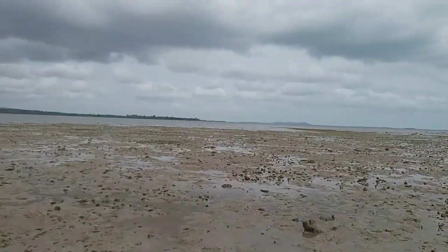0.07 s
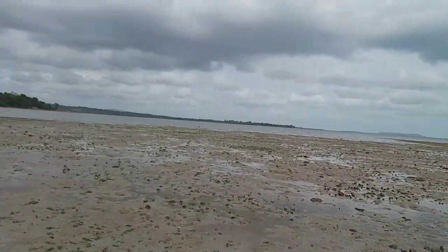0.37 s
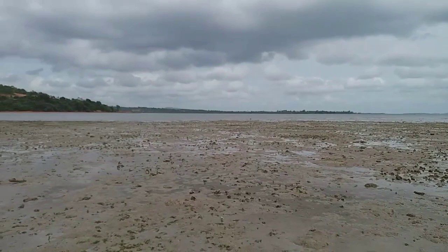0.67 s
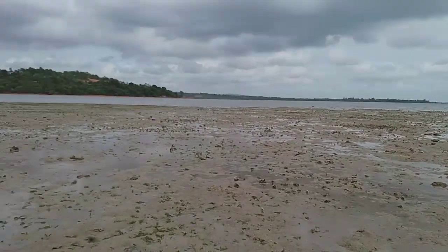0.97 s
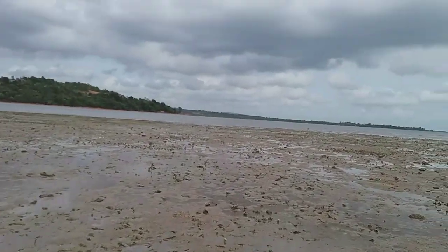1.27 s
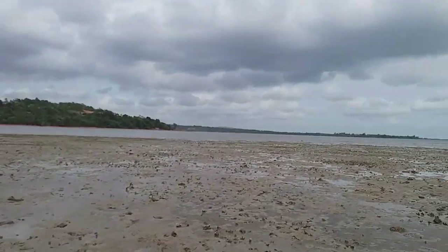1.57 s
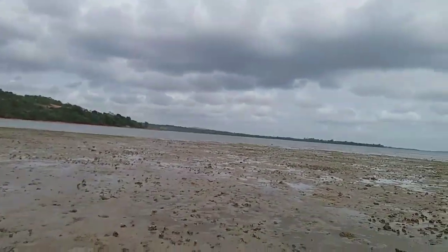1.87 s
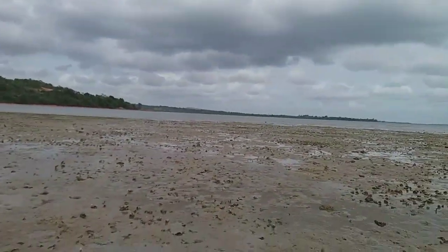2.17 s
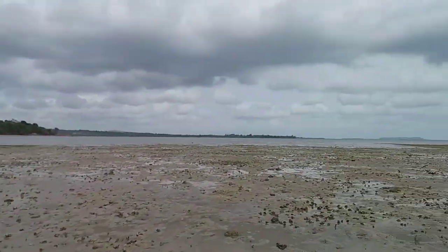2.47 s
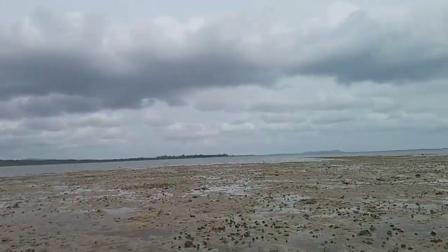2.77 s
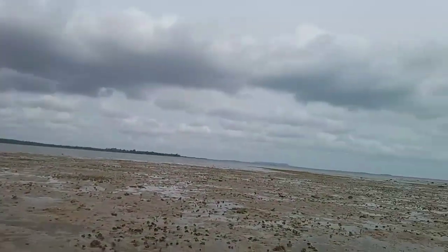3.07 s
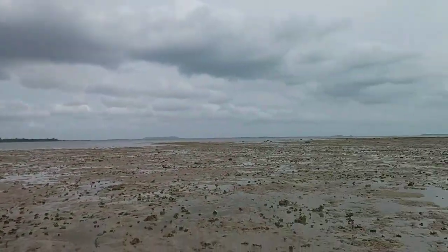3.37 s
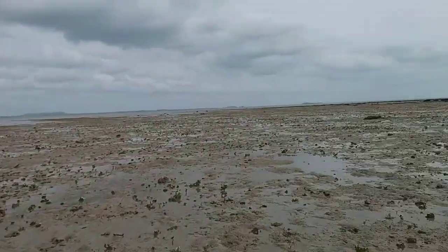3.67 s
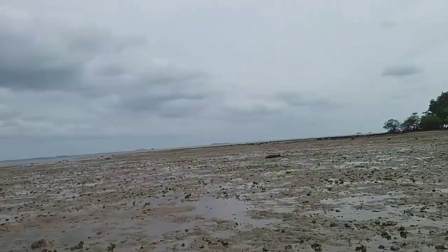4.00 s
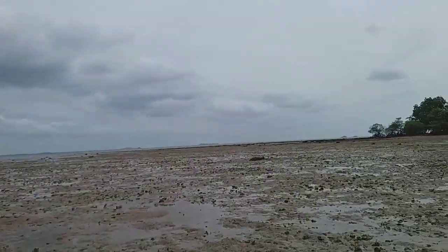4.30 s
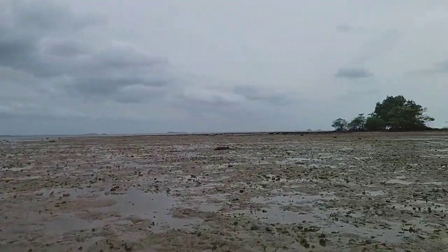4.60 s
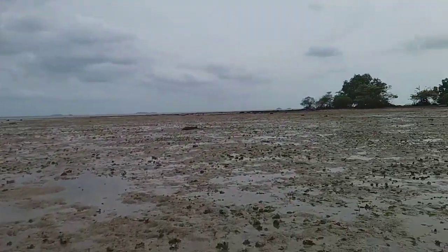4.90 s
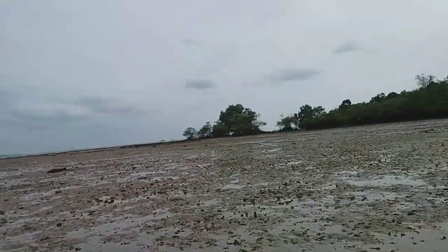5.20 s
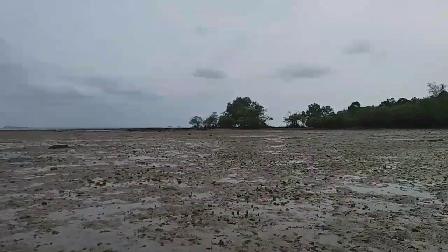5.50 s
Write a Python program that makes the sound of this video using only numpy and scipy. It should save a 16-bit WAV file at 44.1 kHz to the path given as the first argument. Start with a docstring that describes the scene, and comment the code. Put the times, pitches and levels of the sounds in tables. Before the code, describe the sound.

Someone walks evenly across wet mud with soft smacks and squelches, while much louder wind buffets the microphone.

```python
"""Wet footsteps in gusty wind

Someone walks over a wet tidal flat, a step about every 0.65 s, holding a small camera.
Each sole presses water out of the muddy sand: a gritty hiss, tiny bubbles, smacks and plops.
Swirls of air (eddies) tumble over the microphone and rumble and thump far louder than the steps.
Wind and water hiss softly in the distance."""
import sys
import numpy as np
from scipy import signal
from scipy.fft import rfft, irfft, next_fast_len
from scipy.io import wavfile
from scipy.ndimage import uniform_filter1d

SR = 44100
rng = np.random.default_rng(int(sys.argv[2]) if len(sys.argv) > 2 else 0)


def transcribe(u):
    """Save the signal u as a 16-bit wav file named by the first command-line argument.

    u: samples, shape (n,) or (channels, n), limited to [-1, 1]; the rate is SR.
    q: integer samples, one column per channel.
    """
    v = np.clip(np.atleast_2d(u).T, -1, 1)
    q = np.round(v * 32767).astype(np.int16)
    wavfile.write(sys.argv[1], SR, q)


N = 249165
TIME = np.arange(N) / SR

# Each footstep, from heel strike through flat sole to lift-off:
# heel_s, heel_db, flat_s, squelch_db, squelch_decay_s, lift_s, seep_db, spray_db
FOOTSTEPS = [(0.073, -59, .125, -72, .015, 0.39, -54.5, 3.5),
             (0.723, -68, .925, -45, .018, 0.95, -66.5, 3.5),
             (1.423, -56, 1.59, -47.5, 0.023, 1.67, -59.5, 2.5),
             (2.004, -46.5, 2.045, -39, 0.022, 2.255, -61.5, 3.5),
             (2.708, -55, 2.905, -46, 0.026, 2.99, -60, 1), (3.356, -48, 3.513, -40, 0.022, 3.66, -61.5, 0),
             (4.031, -47.5, 4.125, -63, 0.015, 4.25, -71.5, 4.5),
             (4.664, -51, 4.815, -55, 0.029, 4.9, -65, 3),
             (5.323, -48.5, 5.345, -44.5, 0.018, 5.52, -60.5, -1.5)]
# The tone of wet mud, from low to high: pitch_hz, level_db
MUD_TONE = [(250, -21), (700, -4.5), (1500, 1), (2600, 2), (4400, 1.5), (5900, -2), (6900, -1), (8300, -13),
            (10500, -10), (15500, -16)]


def undb(db):
    """Turn decibels into a number to multiply a sound by."""
    return 10 ** (np.asarray(db) / 20)


def curve(points):
    """Join (time, value) points with straight lines, giving one value per sample."""
    times, values = np.transpose(points)
    return np.interp(TIME, times, values)


def add(track, start_s, sound):
    """Mix a sound into the track, dropping whatever falls outside it."""
    start = int(start_s * SR)
    lo, hi = max(start, 0), min(start + len(sound), N)
    if hi > lo:
        track[lo:hi] += sound[lo - start:hi - start]


def keep_side(x, hz, side, order=2):
    """Keep the "low" or the "high" side of hz; a higher order cuts more sharply."""
    return signal.sosfilt(signal.butter(order, hz, side, fs=SR, output="sos"), x)


def treble(x, db, hz=8500):
    """Raise or lower everything above hz."""
    backward = keep_side(x[::-1], hz, "high")
    upper = keep_side(backward[::-1], hz, "high")  # filtering both ways keeps it in step with x
    return x + (undb(db) - 1) * upper


def colour(x, tone):
    """Shape the tone of a sound with (pitch_hz, level_db) points."""
    hz, db = np.transpose(tone)
    size = next_fast_len(len(x) + 2048)
    bins_hz = np.maximum(np.arange(size // 2 + 1) * SR / size, 1)
    gain = undb(np.interp(np.log(bins_hz), np.log(hz), db))
    return irfft(rfft(x, size) * gain, size)[:len(x)]


def even_out(x, span_s):
    """Hold the average level at 1, keeping any flicker faster than span_s."""
    size = int(span_s * SR)
    power = uniform_filter1d(uniform_filter1d(x ** 2, size), size)
    return x / np.sqrt(np.abs(power) + 1e-12)


def wander(turns_per_s):
    """A value that drifts smoothly at random, typically by about 1 either way."""
    size = int(SR / turns_per_s)
    held = np.repeat(rng.standard_normal(N // size + 1), size)[:N]
    smooth = uniform_filter1d(held, size)
    return smooth / smooth.std()


def airflow():
    """Breeze and gusts add up to the strength of the rumble and of the small eddies, in dB."""
    # The breeze at the microphone: time_s, level_db
    breeze = [(0.0, -26), (0.93, -30), (1.08, -19), (1.88, -20.5), (2.02, -25), (2.5, -19), (2.69, -28),
              (2.92, -26.5), (3.12, -19), (3.28, -22.5), (3.42, -39), (3.56, -32.5), (3.71, -49.5),
              (3.75, -35), (4.3, -30), (4.43, -33.5), (4.52, -25.5), (4.82, -35), (4.98, -39), (5.025, -54),
              (5.07, -34), (5.33, -33), (5.39, -19), (5.65, -18.5)]
    # Short gusts that swell and die on top of it: middle_s, length_s, rumble_db, flutter_db
    gusts = [(0.025, 0.057, -14, -17.5), (0.181, 0.072, -15.5, -23), (0.275, 0.17, -17, -30),
             (0.444, 0.067, -28, -32.5), (0.58, .15, -18, -31), (0.705, 0.037, -11.5, -20),
             (0.759, 0.04, -11, -22), (0.85, 0.046, -20.5, -31), (1.345, .08, -22, -20),
             (1.504, 0.022, -22, -17), (1.602, .03, -22, -17.5), (1.74, 0.039, -10.5, -14),
             (1.817, 0.047, -19, -20), (2.504, 0.041, -22, -22), (2.547, 0.053, -22, -22),
             (2.763, 0.066, -18.5, -24), (2.967, .07, -21, -36), (3.079, 0.066, -21.5, -26),
             (3.283, 0.049, -14.5, -16.5), (3.377, 0.077, -30.5, -48), (3.526, 0.057, -22.5, -25.5),
             (3.875, 0.027, -21, -44), (3.946, 0.031, -23.5, -38.5), (4.004, 0.051, -32.5, -36.5),
             (4.082, 0.044, -21.5, -29.5), (4.117, 0.024, -22, -30.5), (4.259, .09, -21, -20),
             (4.343, 0.13, -23.5, -35.5), (4.501, 0.058, -20.5, -21.5), (4.547, 0.056, -18.5, -24.5),
             (4.609, 0.044, -25, -24.5), (4.77, .07, -22.5, -25.5), (4.887, 0.1, -28, -43.5),
             (5.064, 0.037, -27, -41.5), (5.188, 0.074, -23.5, -31.5), (5.284, 0.039, -30, -38.5),
             (5.386, 0.033, -15.5, -21.5), (5.474, 0.04, -27, -17), (5.571, 0.051, -13.5, -19)]
    breeze_db = curve(breeze)
    rumble_power = undb(breeze_db) ** 2
    flutter_power = undb(-26.5 + 1.572 * (breeze_db + 20)) ** 2  # small eddies grow faster than rumble
    for middle_s, length_s, rumble_db, flutter_db in gusts:
        progress = np.clip((TIME - middle_s) / length_s + .5, 0, 1)
        swell = np.sin(np.pi * progress) ** 1.02
        rumble_power += (undb(rumble_db) * swell) ** 2
        flutter_power += (undb(flutter_db) * swell) ** 2
    return 10 * np.log10(rumble_power), 10 * np.log10(flutter_power)


def rumble(level_db):
    """Churning air rumbles; its upper part comes in puffs and dies away in the lulls."""
    # The deep tone of wind on a microphone: pitch_hz, level_db
    rumble_tone = [(20, -26.5), (32, -27), (50, -12.5), (65, -3.5), (120, -0.5), (190, -2), (300, -8),
                   (420, -16), (650, -37), (1200, -56), (2500, -92.5)]
    noise = even_out(colour(rng.standard_normal(N), rumble_tone), span_s=0.19)
    puffs_db = 4 * wander(28).clip(-2, 1.2)
    lulls_db = 0.38 * np.minimum(level_db + 23, 0)
    return treble(noise, puffs_db + lulls_db, hz=210) * undb(level_db)


def eddy(hz, turn):
    """A passing swirl pushes and pulls once, more briefly at higher hz; turn (0 to 1) sets its shape."""
    position = np.linspace(-14, 14, int(28 * SR / (np.pi * hz)))
    pressure = np.real(np.exp(2j * np.pi * turn) / (1 - 1j * position) ** 3)
    return pressure * np.hanning(len(position))


def flutter(level_db, base_hz=255, count=2200):
    """Small eddies arrive in clumps; the harder the air pushes, the faster they pass."""
    out = np.zeros(N)
    timings = rng.random((count, 2))
    variations = rng.standard_normal((count, 2)).clip(-1.8, 1.8)
    clump = wander(110).clip(-2, 2)
    speed = undb(0.1165 * (np.minimum(level_db, -22) + 33)) * np.exp(0.097 * clump)
    for (when, turn), (pace, size) in zip(timings, variations):
        i = int(when * N)
        hz = base_hz * speed[i] * np.exp(0.193 * pace)
        add(out, i / SR, undb(3 * size + 4 * clump[i]) * eddy(hz, turn))
    return even_out(keep_side(out, 270, "high"), span_s=0.079) * undb(level_db)


def soft_thumps(flutter_db, middle_hz=350, count=36):
    """Stray eddies thump at random times, harder when the air is rough."""
    out = np.zeros(N)
    for when, pace, turn in rng.random((count, 3)):
        level_db = min(flutter_db[int(when * N)] + 9, -14)
        thump = eddy(middle_hz * np.exp(0.18 * (2 * pace - 1)), turn)
        add(out, (when * N - len(thump) / 2) / SR, undb(level_db) * thump)
    return out


def strong_thumps(main_pace=0.96, weak_pace=0.79, weak_db=-5.5, spread_s=0.004033):
    """Each strong eddy thumps the microphone, with three weaker, slower ones tumbling around it."""
    # Strong single eddies (the paces scale their pitch): middle_s, level_db, base_pitch_hz
    strong_eddies = [(0.022, -4.5, 627), (0.041, -9, 424), (0.164, -2, 200), (0.203, -1.5, 324),
                     (0.344, -13.5, 308), (0.702, 1.5, 450), (0.761, -7, 586), (0.843, -4, 302),
                     (1.009, -5, 262), (1.071, -5.5, 330), (1.098, -3, 433), (1.15, -2, 460),
                     (1.167, -5.5, 443), (1.183, 1, 166), (1.208, -5.5, 420), (1.236, -8.5, 400),
                     (1.302, -1, 348), (1.33, -3, 500), (1.344, 0.5, 370), (1.359, -2.5, 522),
                     (1.418, -6, 420), (1.461, 0, 450), (1.497, -2.5, 525), (1.512, 0.5, 505),
                     (1.551, -5.5, 380), (1.601, -2, 514), (1.642, -5.5, 475), (1.703, -11.5, 472),
                     (1.723, -6, 586), (1.802, 0.5, 500), (1.806, -2, 600), (1.827, -2, 495),
                     (2.173, -9, 330), (2.207, -4.5, 310), (2.264, -2.5, 434), (2.308, -10, 423),
                     (2.334, -6.5, 308), (2.382, -4.5, 344), (2.456, -1.5, 377), (2.507, -5, 380),
                     (2.859, -4, 160), (2.988, -13, 330), (3.064, -4.5, 275), (3.089, -9, 380),
                     (3.118, -2.5, 165), (3.148, -11, 320), (3.274, -1, 400), (3.287, -3.5, 320),
                     (3.489, -11.5, 143), (4.231, -3, 174), (4.246, 0, 500), (4.278, -1, 168),
                     (4.469, -3, 565), (4.507, -2, 540), (4.532, -12, 450), (4.555, -8.5, 374),
                     (4.605, -9, 348), (4.616, -5, 260), (4.668, -8, 437), (4.772, -5.5, 290),
                     (5.146, -7, 298), (5.277, -16.5, 386), (5.379, -10, 663), (5.395, -4, 845),
                     (5.426, -2, 413), (5.472, 1, 450), (5.508, -8.5, 930), (5.537, -7.5, 590),
                     (5.554, -8, 495), (5.572, -8, 547), (5.579, 5, 940), (5.601, -11.5, 1100),
                     (5.624, -2.5, 540)]
    out = np.zeros(N)
    for middle_s, level_db, base_hz in strong_eddies:
        main = eddy(main_pace * base_hz, rng.random())
        add(out, middle_s - len(main) / SR / 2, undb(level_db) * main)
        for lag, turn in rng.random((3, 2)):
            weak = eddy(weak_pace * base_hz, turn)
            weak_s = middle_s + (3 * lag - 1) * spread_s
            add(out, weak_s - len(weak) / SR / 2, undb(level_db + weak_db) * weak)
    return out


def wind():
    """Rough air at the microphone's opening: a deep rumble, fluttering eddies and single thumps."""
    rumble_db, flutter_db = airflow()
    air = undb(5) * rumble(rumble_db) + undb(0.5) * flutter(flutter_db)
    air = air + soft_thumps(flutter_db) + undb(-0.07) * strong_thumps()
    air = keep_side(air, 42, "high", order=3)  # the slowest pushes leak out through a vent
    air = air / (1 + (air / .93) ** 4) ** (1 / 4)  # the microphone's membrane rounds off the strongest
    return keep_side(air, 3700, "low", order=10)  # eddies smaller than the opening average out


def distant_hiss():
    """Wind and water hiss smoothly, far across the flat."""
    # The tone of the hiss: pitch_hz, level_db
    hiss_tone = [(500, 5.5), (1000, 3), (2000, -2.5), (3000, -8.5), (4500, -14.5), (5800, -23),
                 (6900, -20.5), (8000, -41), (9000, -21.5), (10500, -20), (15500, -21.5)]
    # Its slow rise and fall: time_s, level_db
    hiss_levels = [(0, -52.5), (1.25, -49.5), (2.6, -52.5), (3.9, -52), (4.6, -56.5), (5.65, -52.5)]
    sway_db = .6 * wander(3)
    hiss = even_out(colour(rng.standard_normal(N), hiss_tone), span_s=0.91)
    return hiss * undb(curve(hiss_levels) + sway_db)


def bubble(hz, cycles, glide):
    """A tiny hollow of air rings and rises in pitch as it opens."""
    progress = np.linspace(0, 1, int(cycles * SR / hz) + 4)
    ring = np.sin(2 * np.pi * cycles * progress * (1 + glide * progress))
    return ring * np.exp(-5 * progress) * (1 - progress)


def crackle(low_hz=1000, high_hz=13000, count=10000):
    """Films of water and tiny bubbles burst between the sand grains."""
    out = np.zeros(N)
    bursts = rng.random((count, 3))
    sizes = rng.exponential(size=count).clip(0, 4.5)
    for (when, pitch, ring), size in zip(bursts, sizes):
        hz = low_hz * (high_hz / low_hz) ** pitch
        burst = bubble(hz, cycles=2 + 24 * ring ** 2, glide=.12)
        add(out, when * N / SR, undb(3 * size) * np.sqrt(hz) * burst)
    return even_out(out, span_s=0.033)


def gurgle(middle_hz=3600, count=520):
    """Larger bubbles in the squeezed water each give a short rising plip."""
    out = np.zeros(N)
    for when, (pitch, size) in zip(rng.random(count), rng.standard_normal((count, 2)).clip(-1.7, 1.7)):
        plip = bubble(middle_hz * np.exp(.35 * pitch), cycles=40, glide=0.11)
        add(out, when * N / SR, undb(3 * size) * plip)
    return out


def peak_at(peak_s, rise_s, fall_s):
    """A level that swells to 1 at peak_s and dies away."""
    distance = np.maximum((peak_s - TIME) / rise_s, (TIME - peak_s) / fall_s)
    return np.exp(-np.minimum(distance, 20))


def squelches(heel_rise_s=.007, heel_decay_s=0.018, drain_db_per_s=14, release_s=0.0074, refill_s=0.21):
    """The heel lands, the sole flattens, water seeps: hiss, crackle and bubbles follow the pressure."""
    pressure, treble_db = np.zeros(N), np.zeros(N)
    spurts_db = 2 * wander(55).clip(-2, 2)  # water seeps out unevenly
    for heel_s, heel_db, flat_s, squelch_db, decay_s, lift_s, seep_db, spray_db in FOOTSTEPS:
        since_heel = np.maximum(TIME - heel_s, 0)
        since_lift = np.maximum(TIME - lift_s, 0)
        contact = np.minimum(since_heel / heel_rise_s, 1) * np.exp(-since_lift / release_s)
        heel = undb(heel_db) * np.exp(-since_heel / heel_decay_s)
        sole = undb(squelch_db) * peak_at(flat_s, 0.52 * decay_s, decay_s)
        seep = undb(seep_db + spurts_db - drain_db_per_s * since_heel)
        refill = undb(-68) * (since_heel > 0) * np.exp(-since_lift / refill_s)  # the footprint fills
        pressure += contact * (heel + sole + seep) + refill
        treble_db[TIME > heel_s] = spray_db + 7  # fine spray brightens the sound
    grit = crackle() + undb(-5) * rng.standard_normal(N)
    wet_sand = even_out(colour(grit, MUD_TONE), span_s=0.016)
    bubbling = np.tanh(pressure / undb(-52))  # bubbles grow no louder under a hard push
    return treble(wet_sand, treble_db) * pressure + undb(-43) * bubbling * gurgle()


def smack(hz, spray_db, ring_db=1, cycles=18):
    """Mud slaps or tears from the sole: a wet crack, a ringing hollow and a short splatter."""
    t = TIME[:2048]
    swell = 1 - np.exp(-t / .0014)
    crack = np.exp(-t / .003)
    splatter = undb(-15) * np.exp(-t / .01)
    sound = rng.standard_normal(len(t)) * (crack + splatter)
    add(sound, 0, undb(ring_db) * bubble(hz, cycles, glide=0.026))
    sound = treble(colour(sound * swell, MUD_TONE), spray_db + 10)
    return sound / np.abs(sound).max()


def loud_smacks(lead_s=.001):
    """The mud smacks loudly several times with each step."""
    # Wet smacks of mud on the sole: peak_s, level_db, pitch_hz, spray_db
    mud_smacks = [(0.0782, -23.5, 4180, -6), (0.1093, -25.5, 4130, -10), (0.128, -22, 4130, -3),
                  (0.184, -32, 2970, -20), (0.3786, -28, 2750, -4), (0.434, -33, 2420, -30),
                  (0.6379, -45, 2640, -13), (0.7246, -20, 2830, -10), (0.7344, -32, 5140, 5),
                  (0.78, -28, 2650, -5), (0.842, -32, 2680, 0), (0.9098, -32, 2500, -20),
                  (0.997, -35.5, 6540, -10), (1.3124, -44.5, 2500, -24), (1.4284, -19, 4430, -9),
                  (1.472, -22, 4600, -3), (1.5493, -22.5, 4860, -11), (1.5895, -27, 2440, -21),
                  (1.6047, -29, 3880, 8), (1.6364, -26, 2920, -28), (1.756, -29.5, 2650, -8),
                  (2.0357, -24, 3670, -21), (2.2038, -27.5, 2510, -4), (2.253, -31.5, 2750, 9),
                  (2.753, -32, 3850, -21), (2.827, -31.5, 2540, -3), (2.949, -31, 3780, -6),
                  (3.083, -39, 3660, -4), (3.1353, -41.5, 2500, 1), (3.365, -21.5, 4780, -14),
                  (3.407, -30, 3800, -10), (3.508, -21, 7360, -1), (3.6682, -38, 2600, -28),
                  (3.8294, -30, 3050, -37), (4.0342, -25.5, 4850, -9), (4.122, -31.5, 2550, -19),
                  (4.188, -36.5, 2580, -20), (4.2577, -32, 2560, -26), (4.2867, -44, 4210, -32),
                  (4.332, -38.5, 4030, -22), (4.393, -40, 2770, -24), (4.4363, -52, 3200, -5),
                  (4.6694, -31, 2820, -27), (4.7175, -36, 4140, 0.5), (4.7383, -31, 2750, -27),
                  (4.815, -29, 3550, -3), (4.912, -34, 2740, -30), (4.971, -33, 2590, -26),
                  (5.08, -43, 6500, -10), (5.189, -35.5, 2820, -37), (5.412, -28.5, 2900, -18)]
    out = np.zeros(N)
    for peak_s, level_db, pitch_hz, spray_db in mud_smacks:
        add(out, peak_s - lead_s, undb(level_db) * smack(pitch_hz, spray_db))
    return out


def soft_pops(low_hz=2500, high_hz=4400, settle_s=.06, per_step=4):
    """Softer, rounder pops come at random under each foot and while its print settles."""
    out = np.zeros(N)
    for heel_s, _, _, _, _, lift_s, _, _ in FOOTSTEPS:
        for when, softness, pitch in rng.random((per_step, 3)):
            start_s = heel_s + when * (lift_s + settle_s - heel_s)
            pop = smack(low_hz + pitch * (high_hz - low_hz), spray_db=-16, ring_db=9, cycles=28)
            add(out, start_s, undb(-38 - 9 * softness) * pop)
    return out


def air_plops():
    """Trapped air squirts out with a rough plop; its pitch slides as the pocket changes size."""
    # Air pockets squeezed out of the mud: start_s, start_hz, end_hz, length_s, level_db, roughness
    air_pockets = [(0.435, 1200, 1460, 0.0033, -33, 0.93), (0.821, 1650, 2750, 0.022, -47, 0.23),
                   (0.923, 2860, 2600, 0.0088, -36, 0.51), (.922, 1280, 1600, 0.0097, -36.5, 0.38),
                   (3.59, 1090, 1420, 0.0099, -38.5, 1.5), (3.667, 2030, 2410, 0.007, -34.5, 0.74),
                   (3.827, 1230, 2160, 0.0066, -34, 0.77), (4.913, 1140, 1500, 0.0048, -39.5, 1.4),
                   (4.972, 2260, 2450, 0.0034, -35.5, 0.34)]
    out = np.zeros(N)
    for start_s, start_hz, end_hz, length_s, level_db, roughness in air_pockets:
        progress = np.linspace(0, 1, int(length_s * SR))
        pitch_hz = start_hz + (end_hz - start_hz) * progress
        jitter = 1 + roughness * rng.standard_normal(len(progress))
        phase = 2 * np.pi * np.cumsum(pitch_hz * jitter) / SR
        swell = np.sin(np.pi * np.sqrt(progress))
        add(out, start_s, undb(level_db) * np.sin(phase) * swell)
    return out


def auto_volume(x, threshold_db=-8, share=0.43, recovery_db_per_s=16, react_s=0.004, boost_db=1):
    """The camera turns itself down after a loud thump and comes slowly back up."""
    level_db = 20 * np.log10(np.abs(x) + 1e-9)
    wanted_cut_db = share * np.maximum(level_db - threshold_db, 0)
    recovery_db = recovery_db_per_s * TIME
    held_cut_db = np.maximum.accumulate(wanted_cut_db + recovery_db, axis=-1) - recovery_db
    smooth_cut_db = keep_side(held_cut_db, 1 / (2 * np.pi * react_s), "low", order=1)
    return x * undb(boost_db - smooth_cut_db)


def scene():
    """Wind, footsteps and distant hiss on open ground, in one channel with no echo."""
    feet = undb(3) * squelches() + undb(-4.5) * (loud_smacks() + soft_pops()) + undb(3.5) * air_plops()
    return (wind() + feet + distant_hiss())[None]


def record(dry, top_hz=15700):
    """The camera adjusts its own volume and cuts off the highest treble."""
    steep_cut = signal.ellip(10, .2, 90, top_hz, fs=SR, output="sos")
    return signal.sosfilt(steep_cut, auto_volume(dry))


dry = scene()
out = record(dry)
transcribe(out)
```